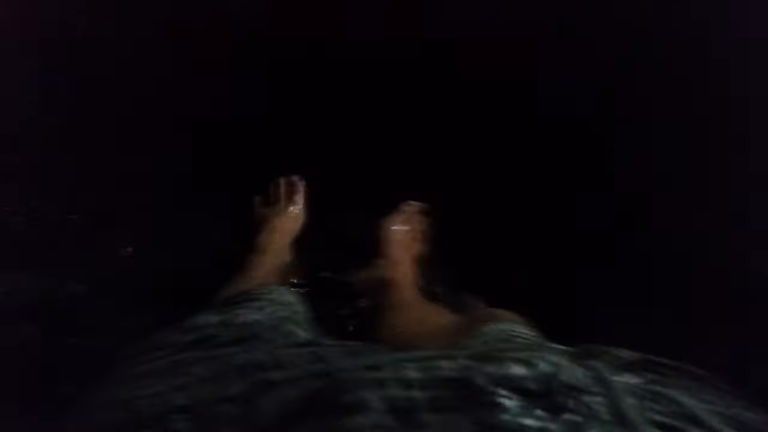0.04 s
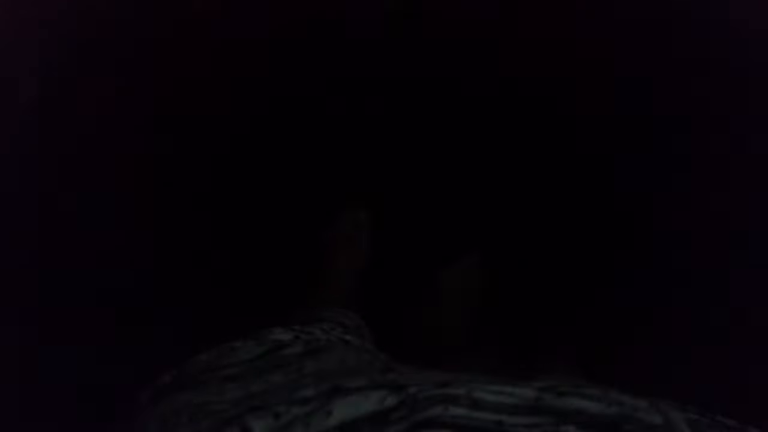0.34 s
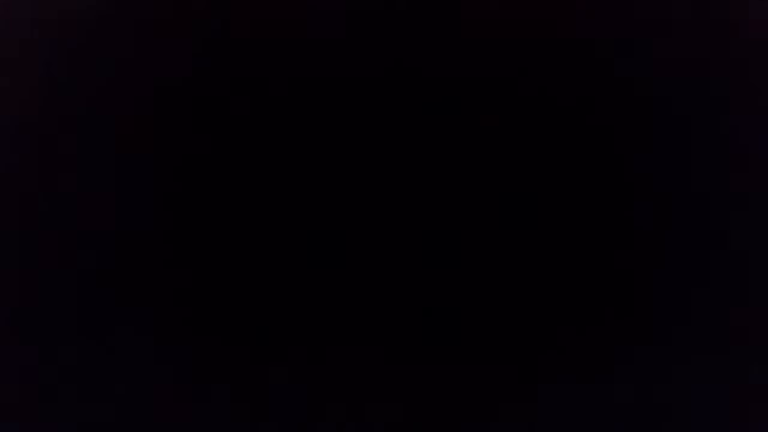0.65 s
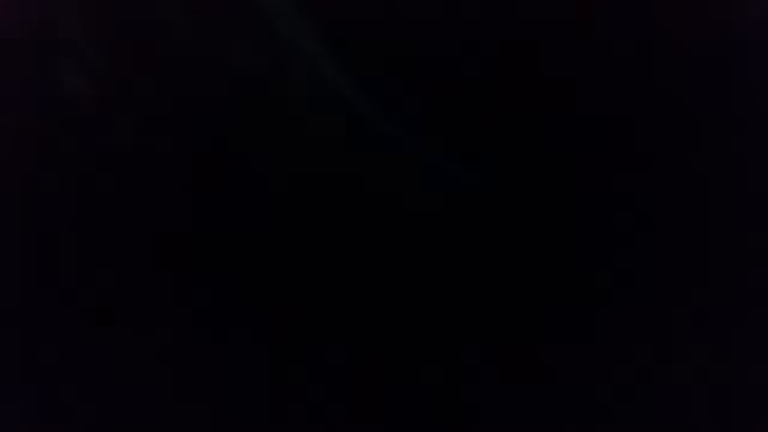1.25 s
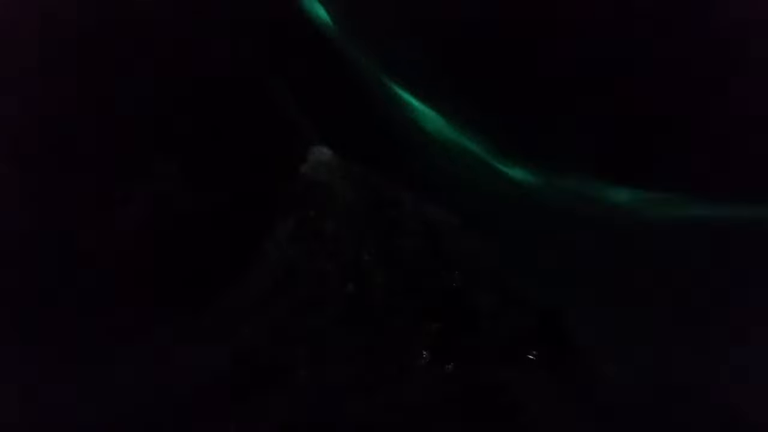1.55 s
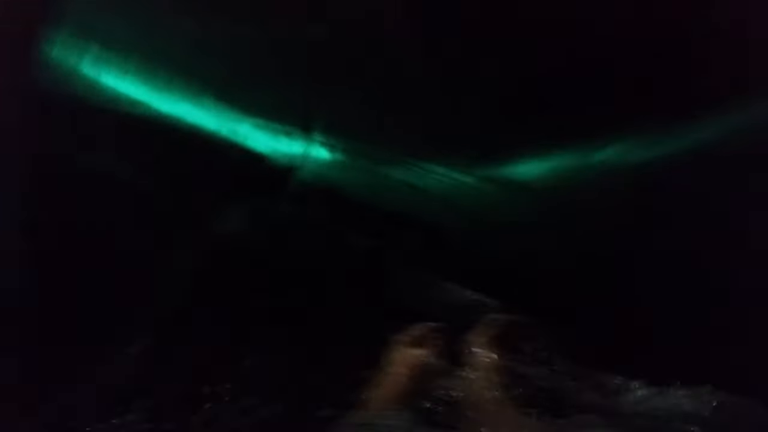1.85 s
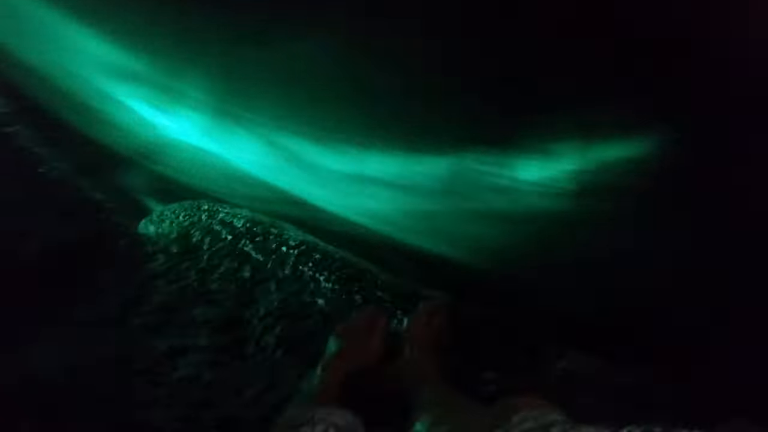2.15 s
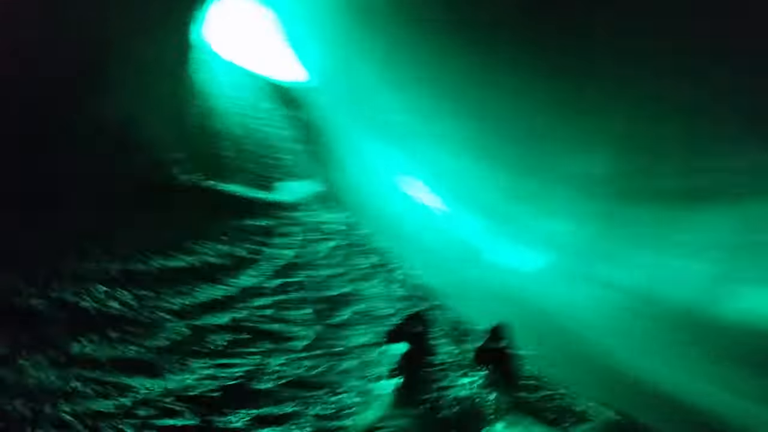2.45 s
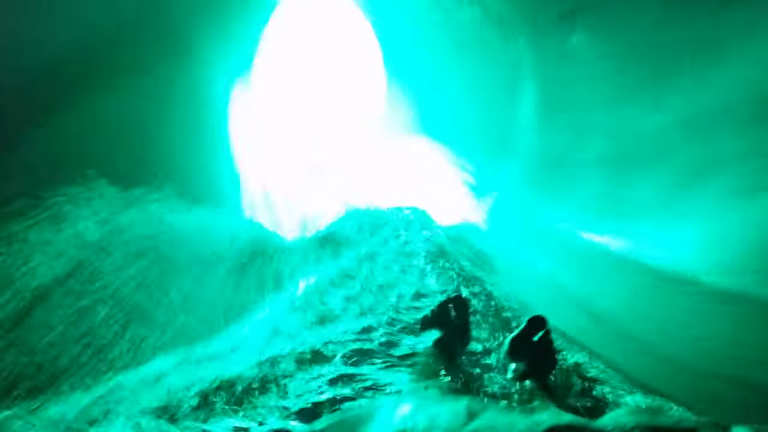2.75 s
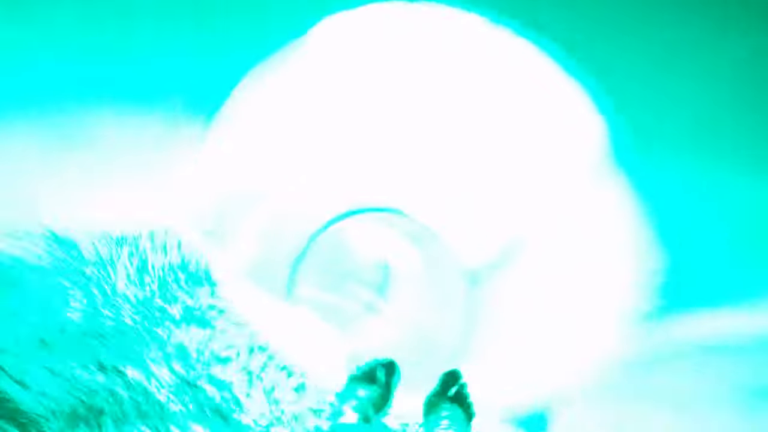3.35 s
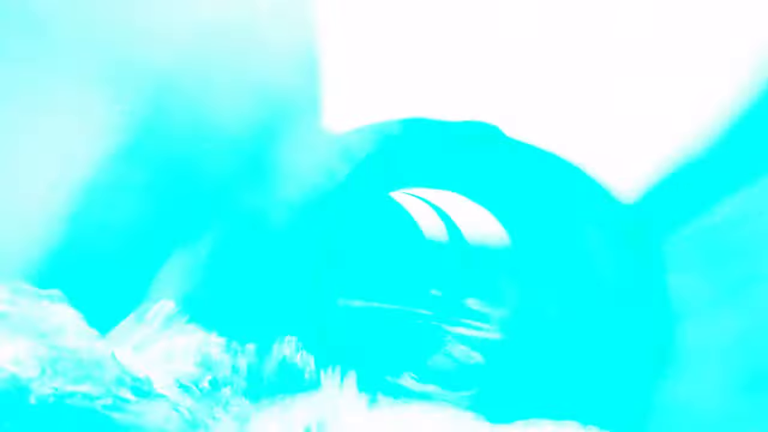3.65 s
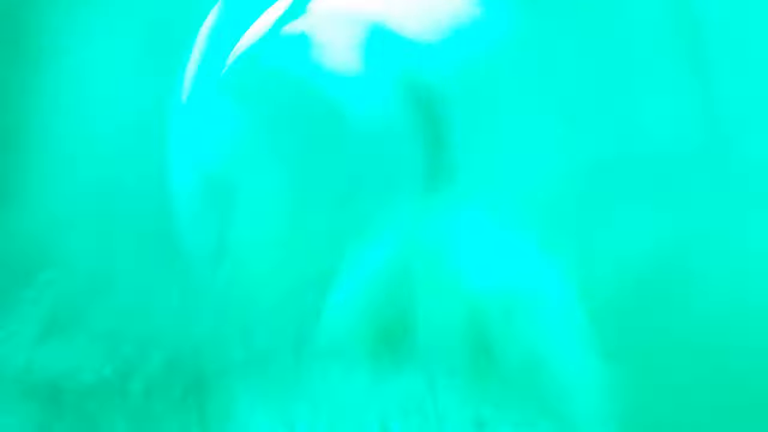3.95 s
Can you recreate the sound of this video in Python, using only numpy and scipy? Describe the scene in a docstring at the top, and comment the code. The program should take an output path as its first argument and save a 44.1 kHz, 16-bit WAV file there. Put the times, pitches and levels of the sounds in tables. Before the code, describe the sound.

Close rushing water and spray on a ride through a tube slide, growing louder.

```python
"""Down an enclosed water slide

A waterproof camera rides the tube at arm's length, the water growing louder as the rider gathers speed.
The open right microphone port hears rushing water and spray, and is buffeted by air and splashes.
The left port lies under a film of water: it hears the tube dully, is slapped and sloshed,
and now and then seals shut. A limiter ducks both channels on the hardest hits."""
import sys
import numpy as np
from scipy import signal
from scipy.fft import rfft, irfft
from scipy.io import wavfile
from scipy.ndimage import uniform_filter1d, minimum_filter1d

SR = 44100
rng = np.random.default_rng(int(sys.argv[2]) if len(sys.argv) > 2 else 0)


def digitize_waveform(pressure):
    """Quantize a signal to 16-bit integers and store it at the path in sys.argv[1].

    Rows of a 2-D input are taken as channels; values are limited to [-1, 1].
    """
    field = np.atleast_2d(pressure).T
    bounded = np.clip(field, -1, 1)
    quanta = np.round(bounded * 32767).astype(np.int16)
    wavfile.write(sys.argv[1], SR, quanta)


N = 176400
T = np.arange(N) / SR

# housing resonances under droplets (frequency [Hz], gain [dB])
HOUSING_COLOUR = [(20, -27), (2000, -14.5), (3800, -6.5), (4600, -1.5), (5050, 2.5), (5500, -7),
                  (6100, -9.5), (7100, -6.5), (7800, -19.5), (8900, -16), (10000, -5), (11800, 2),
                  (13200, 0.5), (14700, -7.5), (16000, -14.5)]


def amp(db):
    """Decibels to gain."""
    return 10 ** (np.asarray(db) / 20)


def unit(x):
    """Scales to an rms of one."""
    return x / np.sqrt(np.mean(x ** 2) + 1e-20)


def level(curve):
    """Gain over time from rows of (time [s], level [dB])."""
    return amp(np.interp(T, *np.transpose(curve)))


def colour(x, points):
    """Minimum-phase filter from rows of (frequency [Hz], gain [dB]); the result has an rms of one."""
    hz, db = np.transpose(points)
    log_hz = np.log(abs(np.fft.fftfreq(N, 1 / SR)) + 1)
    log_gain = np.log(amp(np.interp(log_hz, np.log(hz), db)))
    response = np.exp(np.conj(signal.hilbert(log_gain)))
    return unit(np.fft.ifft(np.fft.fft(x) * response).real)


def flutter(rate_hz, depth_db):
    """Random gain that wanders at up to about the given rate."""
    hz = np.fft.rfftfreq(N, 1 / SR)
    shape = hz / (hz + rate_hz / 10) * np.exp(-(hz / rate_hz) ** 2)
    drift = unit(irfft(rfft(rng.standard_normal(N)) * shape, N))
    return unit(amp(depth_db * 2 * np.tanh(drift / 2)))


def impacts(per_s, spread_db):
    """Random pushes and pulls; a positive spread makes a few stronger, a negative one weaker."""
    size = amp(spread_db * np.minimum(rng.exponential(1, N), 4))
    return unit(size * rng.choice([-1., 1.], N) * (rng.random(N) < per_s / SR))


def add(mix, at, sound):
    """Mixes a sound in at the given time."""
    part = mix[max(round(at * SR), 0):][:len(sound)]
    part += sound[:len(part)]


def burst(source, at, length, db):
    """A bell-shaped swell of a turbulent source: returns (start [s], sound)."""
    start = max(int((at - 2 * length) * SR), 0)
    end = min(int((at + 2 * length) * SR) + 2, N)
    bell = np.exp(-2 * ((T[start:end] - at) / length) ** 2)
    return start / SR, amp(db) * unit(bell * source[start:end]) * np.sqrt(np.mean(bell ** 2))


def film_hiss(db=-46):
    """The thin sheet of water under the rider hisses all the way down."""
    # thin, high hiss (frequency [Hz], gain [dB])
    tone = [(20, -49), (2000, -24), (2600, 5), (3600, -21), (4700, -9), (5300, 8.5), (5800, 1), (6600, -13),
            (8000, -50), (16000, -34)]
    return amp(db) * colour(rng.standard_normal(N), tone) * flutter(rate_hz=16, depth_db=2.5)


def tube_roar():
    """The hollow roar of water further along the tube."""
    # tube resonances (frequency [Hz], gain [dB])
    tone = [(20, -22), (150, -13.5), (280, -7.5), (380, -10.5), (480, -5), (570, -10.5), (750, -5),
            (950, -8.5), (1200, -14), (1500, -20.5), (2000, -24), (2700, -29.5), (4350, -30), (5100, -50),
            (6300, -46), (8500, -78), (11000, -57), (13000, -42), (16000, -58)]
    # roar at the left port (time [s], level [dB])
    swell = [(0, -34), (.08, -39.5), (.18, -42), (.52, -42.5), (.6, -39), (.67, -40.5), (.96, -41.5),
             (1.03, -35), (1.3, -36), (1.9, -35), (2.3, -34.5), (2.9, -32), (3.3, -34), (3.86, -30),
             (3.95, -30), (4, -27)]
    return colour(rng.standard_normal(N), tone) * flutter(rate_hz=28, depth_db=0.5) * level(swell)


def bubbles(per_s=260, low_hz=463, high_hz=1838, decay_cycles=7.7, sizes=30):
    """Small bubbles ring for a few cycles and rise in pitch."""
    t, out = T[:SR // 20], np.zeros(N)
    for hz in np.geomspace(low_hz, high_hz, sizes):
        ring = np.sin(2 * np.pi * hz * t * (1 + 2.42 * t)) * np.exp(-t * hz / decay_cycles)
        out += signal.oaconvolve(impacts(per_s / sizes, spread_db=-1.0), ring)[:N]
    return unit(out)


def stream(bubbles_db=-8.5):
    """The dense wash of the stream running down the tube, with bubbles in it."""
    # rushing water (frequency [Hz], gain [dB])
    tone = [(20, -4), (250, 6), (550, -7.5), (800, 1), (1050, 1), (1300, 1.5), (1700, 0.5), (1950, -2.5),
            (2230, -10), (2750, -11.5), (3700, -17.5), (6000, -37), (8000, -76), (16000, -49)]
    # strength of the stream (time [s], level [dB])
    swell = [(0, -29), (.15, -30.5), (.6, -28.5), (1.14, -25.5), (1.25, -27.5), (1.85, -28), (2.3, -25),
             (3.5, -24.5), (3.75, -25), (4, -24)]
    wash = colour(rng.standard_normal(N), tone) * flutter(rate_hz=19, depth_db=1.0)
    return (wash + amp(bubbles_db) * bubbles()) * level(swell)


def spray():
    """Countless droplets fizz through the resonances of the housing."""
    # fine spray (time [s], relative level [dB])
    swell = [(0.0, -41.5), (0.18, -45.5), (0.57, -38.5), (0.99, -38.5), (1.17, -34), (1.2, -40),
             (1.71, -38.5), (2.04, -37.5), (2.19, -35), (2.52, -36), (2.58, -32.5), (3.54, -33.5),
             (3.57, -27.5), (3.66, -29.5), (3.75, -28), (3.99, -30)]
    drops = impacts(per_s=14000, spread_db=2.0) * flutter(rate_hz=22, depth_db=1.32)
    return amp(1.04) * colour(drops, HOUSING_COLOUR) * level(swell)


def spurts():
    """Uneven sheets of drops fly close past the camera, from a coarse splash to a bright mist."""
    # sheets of spray (peak time [s], length [s], level [dB], brightness [0-1])
    sheets = [(1.005, 0.045, -35, 0.9), (1.147, 0.03, -28, 0.2), (2.47, 0.013, -28, .9),
              (2.985, .03, -26, 0), (3.58, 0.038, -24.5, 0.1), (3.766, .035, -23, 0.2),
              (3.867, 0.0069, -28, 0.6), (3.971, 0.011, -24, 0.8)]
    # coarse drops (frequency [Hz], gain [dB])
    coarse_tone = [(20, -45), (600, -22), (1100, 5), (1800, 2.5), (2400, -9), (5000, -19.5), (8000, -29),
                   (16000, -41)]
    # mist (frequency [Hz], gain [dB])
    mist_tone = [(20, -40), (1200, 4), (2500, 1), (3800, -3.5), (5000, -1.5), (6200, -5.5), (8000, -22),
                 (11000, -3), (16000, -3)]
    drops = impacts(per_s=5000, spread_db=3.0) * flutter(rate_hz=120, depth_db=-1.5)
    coarse, mist = colour(drops, coarse_tone), colour(drops, mist_tone)
    out = np.zeros(N)
    for at, length, db, brightness in sheets:
        add(out, *burst(coarse + brightness * (mist - coarse), at, length, db))
    return out


def ticks(decay_s=0.00067):
    """A few single droplets land right on the open port."""
    # landings (time [s], level [dB])
    droplets = [(0.138, -21), (0.987, -25), (1.027, -21), (2.568, -20), (3.094, -27)]
    fizz = colour(rng.standard_normal(N), HOUSING_COLOUR)
    return fizz * sum(amp(db) * (T >= at) * np.exp(-abs(T - at) / decay_s) for at, db in droplets)


def cracks(rise_s=0.000086):
    """Large drops strike the housing sharply and ring for a few cycles."""
    # strikes (time [s], envelope peak [dB], pitch [Hz], decay [cycles])
    drops = [(0.848, -4.5, 1400, 1.2), (0.8634, -10, 1190, 1.5), (0.8684, -11, 1960, 0.7),
             (0.8732, -18, 2370, 1), (0.9088, -16, 1800, 1), (.917, -7, 1880, 1), (.922, -11, 1970, 0.37),
             (.928, -26, 2420, 1.1), (0.938, -25, 5900, 3.3), (0.99, -11, 1300, 1), (2.529, -16, 950, 2.2),
             (3.016, -4, 860, 2.1)]
    t, out = T[:SR // 50], np.zeros(N)
    for at, db, hz, cycles in drops:
        envelope = (1 - np.exp(-t / rise_s)) * np.exp(-t * hz / cycles)
        add(out, at, amp(db) * envelope / envelope.max() * np.sin(2 * np.pi * hz * t))
    return out


def thuds(width_cycles=0.5):
    """Each slug of water gives the housing one soft push and rebound."""
    # slugs on the right side (time [s], peak [dB], pitch [Hz])
    slugs = [(.23, -3, 186), (.452, -13, 233), (1.076, -7, 210), (1.248, -13, 148), (1.709, -15, 180),
             (1.763, -16, 220), (1.857, -12, 230), (1.932, -8, 250), (2.018, -3.5, 282), (2.285, -4, 268),
             (2.37, -6, 380), (2.446, -5.5, 281), (2.496, -4.5, 140), (2.521, -5.5, 207), (2.529, -7, 240),
             (3.02, -6, 180), (3.523, -3, 350)]
    out = np.zeros(N)
    for at, db, hz in slugs:
        cycles = hz * (T - at)
        bell = np.exp(-np.minimum((cycles / width_cycles) ** 2, 20))
        out -= amp(db) * np.cos(2 * np.pi * cycles) * bell
    return out


def churning(gustiness):
    """Close by, water tumbles in clumps with the eddies and breaks into dull or crackling splashes."""
    # churn around the rider (time [s], level [dB])
    swell = [(0, -37), (.12, -42), (.25, -32), (.48, -42), (.66, -32.5), (.84, -38), (.87, -22.5),
             (1.14, -32), (1.28, -31.5), (1.42, -26), (1.68, -38.5), (1.74, -25.5), (2.03, -28.5),
             (2.16, -29.5), (2.4, -27), (2.8, -25.5), (3.03, -24), (3.2, -24.5), (3.52, -23.5),
             (3.78, -23.5), (3.92, -17.5), (4, -32)]
    # tumbling water (frequency [Hz], gain [dB])
    dull_tone = [(20, -39), (200, 1), (400, 2.5), (700, -2.5), (1000, -5.5), (1700, -18.5), (2300, -26.5),
                 (4000, -37), (7000, -42), (16000, -64)]
    # breaking water (frequency [Hz], gain [dB])
    bright_tone = [(20, 5), (200, 5), (700, 10.5), (1500, 1), (2600, -9.5), (4000, -33), (7000, -49),
                   (16000, -73)]
    # splashes on the right side (peak time [s], length [s], level [dB], brightness [0-1])
    splashes = [(0.661, 0.016, -18, 0.2), (0.739, 0.0079, -17.5, 0.5), (0.848, 0.0028, -11, 0.7),
                (0.86, 0.0036, -15, 0.9), (0.907, 0.0054, -21, 0.9), (0.92, 0.0038, -13, 1),
                (0.934, 0.0057, -18.5, 0.8), (0.99, 0.017, -18.5, 0.24), (1.127, 0.021, -37, 0.9),
                (1.406, 0.0037, -34, 0.3), (2.021, 0.0052, -18, .3), (2.319, 0.032, -19.5, 0),
                (2.371, 0.0029, -15, .3), (2.39, 0.012, -16, .35), (2.44, .04, -24.5, 0.4),
                (2.522, .002, -16, 0), (2.527, 0.0055, -11.5, 0.16), (2.684, 0.01, -19.5, 0.8),
                (3.009, 0.0036, -17, 0.3), (3.014, 0.0034, -14, 0.3), (3.325, 0.0052, -11.5, 0.8),
                (3.53, 0.013, -20, 0), (3.932, 0.02, -18, 0)]
    clumps = unit(gustiness ** 1.6) * flutter(rate_hz=54, depth_db=2.5)
    out = colour(impacts(per_s=2500, spread_db=2.0) * clumps, dull_tone) * level(swell)
    drops = impacts(per_s=2700, spread_db=3.0)
    dull, bright = colour(drops, dull_tone), colour(drops, bright_tone)
    for at, length, db, brightness in splashes:
        add(out, *burst(dull + brightness * (bright - dull), at, length, db))
    return out


def buffeting(gustiness):
    """Eddies of air thump the open port, with stronger gusts on top."""
    # wind on the microphone (time [s], relative level [dB])
    swell = [(0, -15.5), (.1, -31), (.18, -22.5), (.25, -23), (.39, -26), (.45, -22), (.52, -23.5),
             (.62, -18), (.8, -22.5), (.9, -15.5), (1.02, -24), (1.12, -19.5), (1.18, -23.5), (1.24, -16),
             (1.34, -29.5), (1.45, -22), (1.69, -26), (1.73, -17), (2.05, -18.5), (2.085, -18.5),
             (2.12, -19.5), (2.22, -19.5), (2.36, -16.5), (2.86, -20), (3.08, -14.5), (3.125, -27),
             (3.16, -17), (3.5, -18), (3.59, -20.5), (3.7, -14.5), (3.78, -20), (3.85, -15.5), (3.93, -15),
             (3.965, -26), (4, -23)]
    # rumble of the eddies (frequency [Hz], gain [dB])
    eddy_tone = [(10, -16), (30, -10.5), (70, 2), (140, 0.5), (220, -3), (320, -8), (480, -15.5),
                 (900, -52), (2500, -47.5), (16000, -64)]
    # thump of a gust (frequency [Hz], gain [dB])
    gust_tone = [(10, -27), (30, -4), (70, 1.5), (150, 4.5), (260, -1.5), (400, -10), (600, -18),
                 (1000, -39.5), (2500, -57), (16000, -51)]
    # gusts (peak time [s], length [s], level [dB])
    gusts = [(0.255, 0.007, -14.5), (0.579, 0.015, -21), (0.667, 0.022, -17), (1.079, 0.0072, -10.5),
             (1.216, 0.0082, -15), (1.47, 0.02, -23.5), (1.709, 0.0091, -16.5), (1.76, 0.059, -24),
             (2.06, 0.012, -12), (2.33, 0.01, -11), (2.356, .012, -12.5), (2.45, 0.013, -12.5),
             (2.531, 0.02, -14), (2.734, 0.021, -15.5), (3.077, 0.042, -17.5), (3.37, 0.017, -15),
             (3.519, 0.038, -8), (3.661, 0.016, -8.5)]
    eddies = colour(impacts(per_s=900, spread_db=2.12), eddy_tone)
    out = amp(1.0) * eddies * gustiness * level(swell)
    turbulence = colour(impacts(per_s=1700, spread_db=1.1), gust_tone)
    for gust in gusts:
        add(out, *burst(turbulence, *gust))
    return out


def sloshing():
    """Water rolls directly over the left port, with one short run of glugs."""
    # water over the port (time [s], level [dB])
    swell = [(0, -14), (.06, -50), (.15, -28), (.26, -20), (.46, -29.5), (.55, -25), (.6, -11), (.67, -26),
             (.75, -14.5), (.83, -34), (.92, -41), (.99, -18.5), (1.2, -23.5), (1.28, -47), (1.5, -43),
             (1.59, -40), (1.66, -52), (1.98, -39), (2.01, -17), (2.1, -36), (2.21, -27), (2.27, -40),
             (2.8, -39.5), (3.15, -36), (3.48, -33), (3.53, -16), (3.59, -37), (3.7, -35), (3.75, -15),
             (3.83, -38), (3.92, -20), (4, -19)]
    # deep slosh (frequency [Hz], gain [dB])
    slosh_tone = [(10, -22), (30, -4.5), (65, 7.5), (130, -6.5), (200, -14.5), (330, -33.5), (800, -64),
                  (3000, -61), (16000, -91)]
    # hollow gurgle (frequency [Hz], gain [dB])
    gurgle_tone = [(20, -22), (90, 0), (300, 2), (450, 3.5), (680, 1), (850, -10), (1200, -28), (2500, -48),
                   (16000, -86)]
    # glugs (peak time [s], length [s], level [dB])
    glugs = [(2.387, 0.011, -21), (2.419, 0.024, -18), (2.437, .008, -18), (2.451, 0.015, -20),
             (2.475, 0.0088, -16)]
    out = colour(impacts(per_s=1500, spread_db=-1.0), slosh_tone) * level(swell)
    gurgle = colour(impacts(per_s=1500, spread_db=1.5), gurgle_tone)
    for glug in glugs:
        add(out, *burst(gurgle, *glug))
    return out


def water_seal(sealed_db=-42, edge_s=0.0028):
    """Gain of the left port, which goes nearly dead whenever water seals it."""
    # sealed spells (start [s], end [s])
    seals = [(0, .016), (.096, .111), (.133, .152), (.2, .242), (.269, .304), (.458, .474), (1.024, 1.058),
             (1.073, 1.099), (1.161, 1.227)]
    sealed = np.any([(T >= start) & (T < end) for start, end in seals], axis=0)
    return uniform_filter1d(amp(sealed_db * sealed), int(edge_s * SR))


def slaps(swing_hz=93, decay_s=0.003, damping=1.17, knock_hz=1100, knock_decay_s=0.0014, knock_db=-21):
    """Slaps step the pressure on the wet membrane, which swings back; the sharpest knock the housing."""
    # slaps on the left port (time [s], relative level [dB], push or pull [+1/-1], rise [s])
    hits = [(.0928, -8.5, 1, 0.00029), (.112, -3, -1, .002), (.129, 5, 1, 0.00017), (0.26, 1.5, -1, 0.0027),
            (0.264, -12, 1, 0.00065), (1.008, -5, 1, 0.0005), (1.021, -18, -1, 0.0011),
            (1.0606, -8.5, -1, 0.00049), (1.062, -11, -1, .0005), (1.067, -2, -1, 0.00067),
            (1.072, -10, 1, 0.00054), (1.16, -8.5, 1, 0.00025), (1.2017, 7, -1, 0.00025)]
    t, out = T[:SR // 20], np.zeros(N)
    phase = 2 * np.pi * swing_hz * t
    swing = np.exp(-t / decay_s) * (np.cos(phase) - damping * np.sin(phase))
    knock = amp(knock_db) * np.exp(-t / knock_decay_s) * np.sin(2 * np.pi * knock_hz * t)
    for at, db, direction, rise in hits:
        onset = np.hanning(max(int(2 * rise * SR), 3))  # a slow rise smooths the knock away
        add(out, at, direction * amp(db) * np.convolve(swing + knock, onset / onset.sum()))
    return out


def scene(right_roar_db=-10, left_lag_s=0.00039):
    """The wet port on the left, the open port on the right, which the roar of the tube reaches first."""
    gustiness = flutter(rate_hz=59, depth_db=2.5)  # air and churning water surge together
    roar = tube_roar()
    water = churning(gustiness) + stream() + spray() + film_hiss()
    water += ticks() + thuds() + cracks() + spurts()
    right = buffeting(gustiness) + water + amp(right_roar_db) * roar
    late_roar = np.interp(T - left_lag_s, T, roar)
    left = (late_roar + sloshing()) * water_seal() + slaps()
    return np.array([left, right])


def record(dry, threshold_db=1, strength=0.9, hold_s=0.026, ceiling=0.94, cutoff_hz=14750):
    """The camera ducks both channels around the hardest hits, which still clip, then cuts the top end."""
    peak_db = 20 * np.log10(abs(dry).max(0) + 1e-9)
    over_db = np.maximum(peak_db - threshold_db, 0)
    held_db = minimum_filter1d(-strength * over_db, int(hold_s * SR))
    duck_db = uniform_filter1d(held_db, size=260)
    clipped = np.clip(dry * amp(duck_db), -ceiling, ceiling)
    lowpass = signal.firwin(601, cutoff_hz, window=("kaiser", 9), fs=SR)
    return signal.oaconvolve(clipped, lowpass[None], "same")


dry = scene()
out = record(dry)
digitize_waveform(out)
```